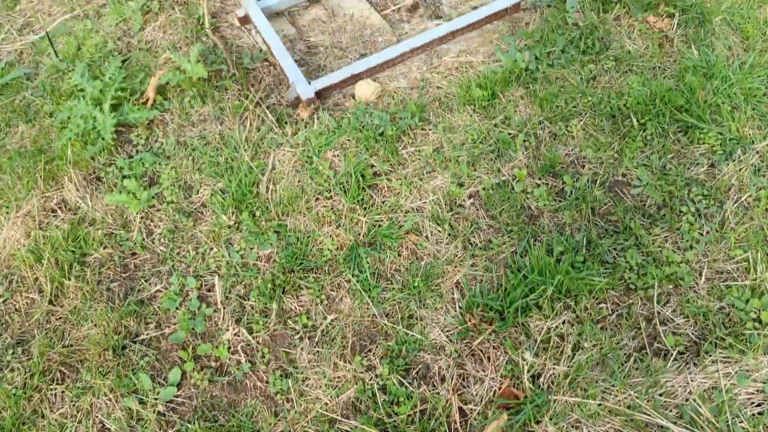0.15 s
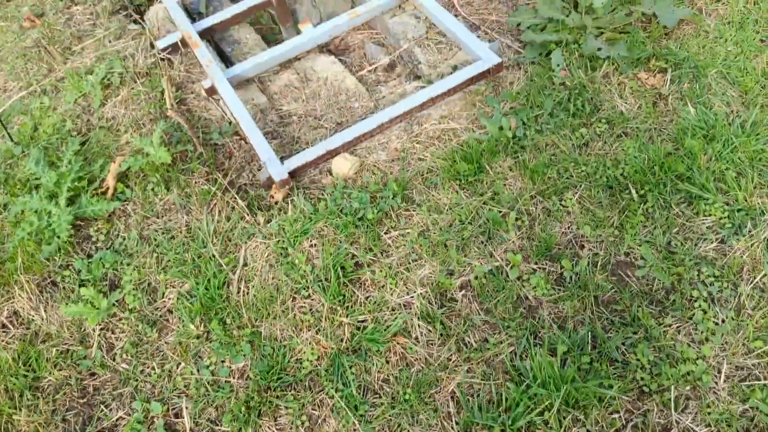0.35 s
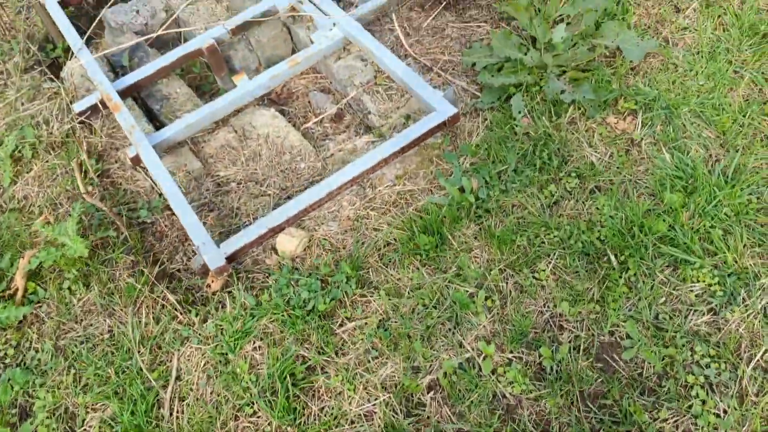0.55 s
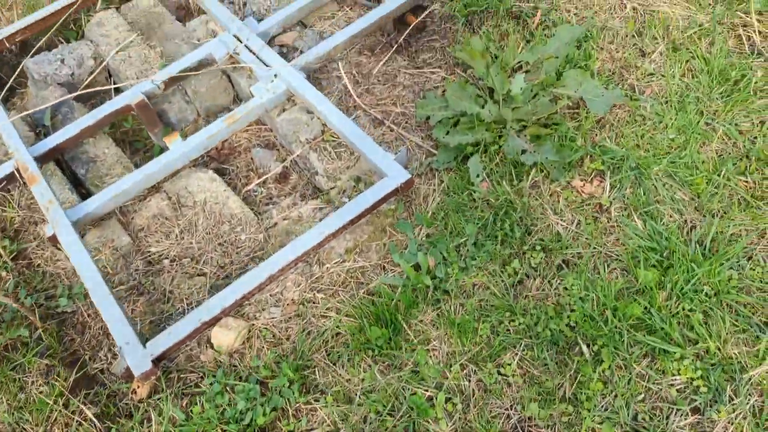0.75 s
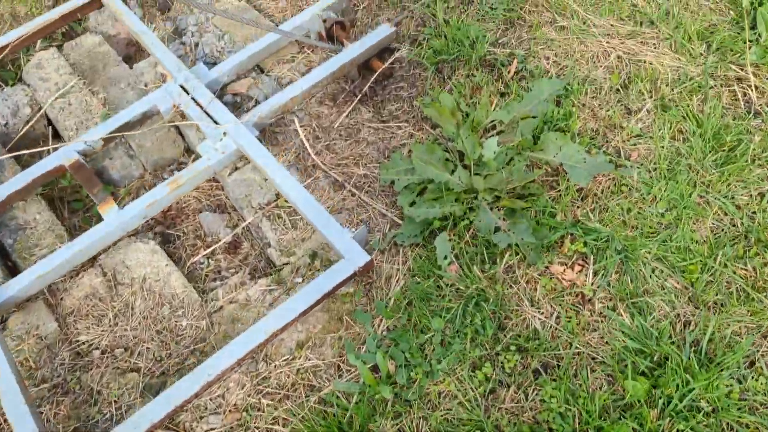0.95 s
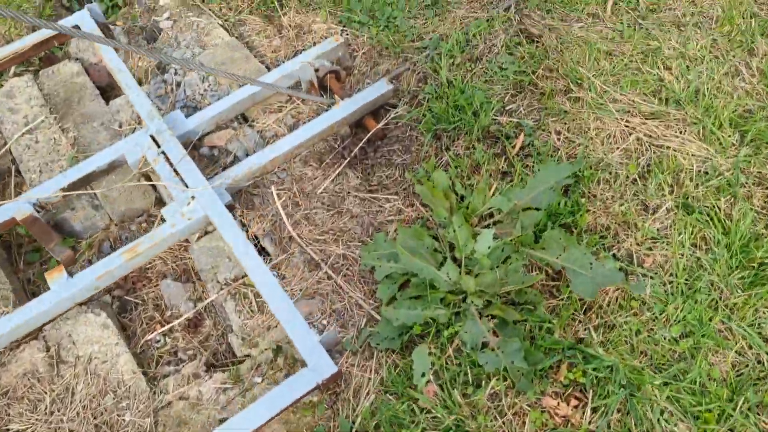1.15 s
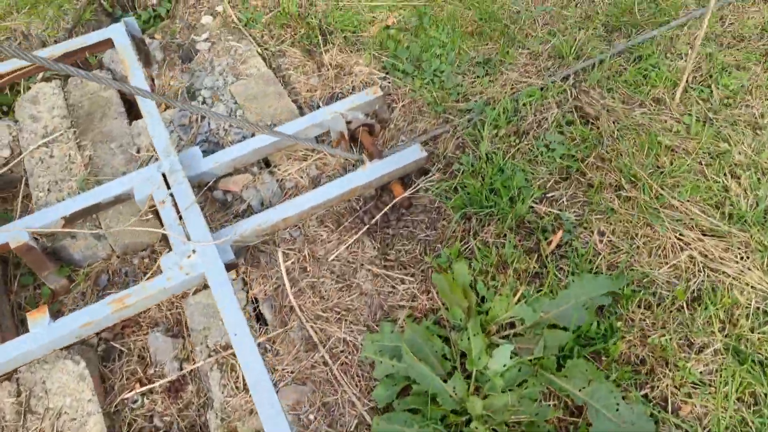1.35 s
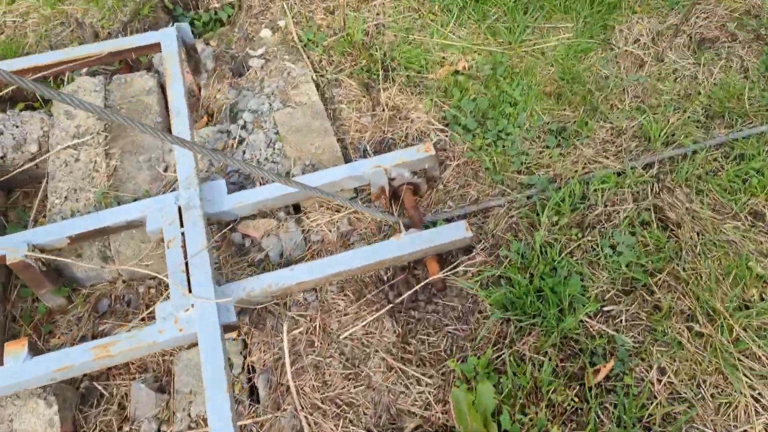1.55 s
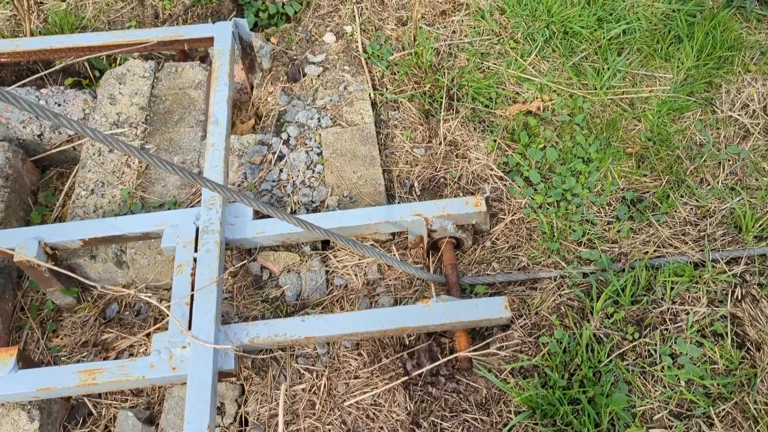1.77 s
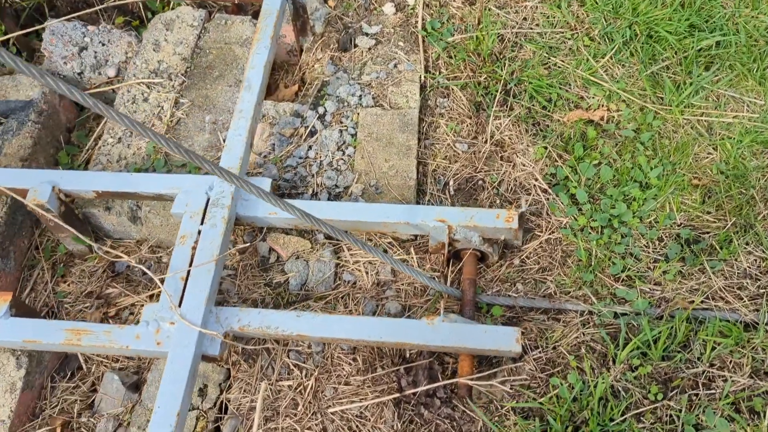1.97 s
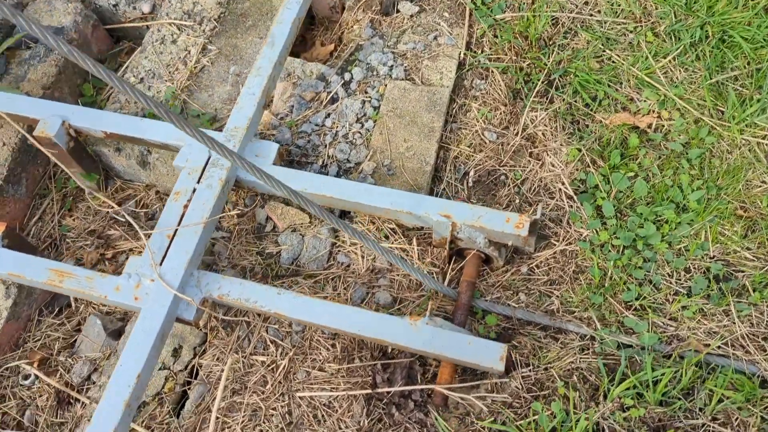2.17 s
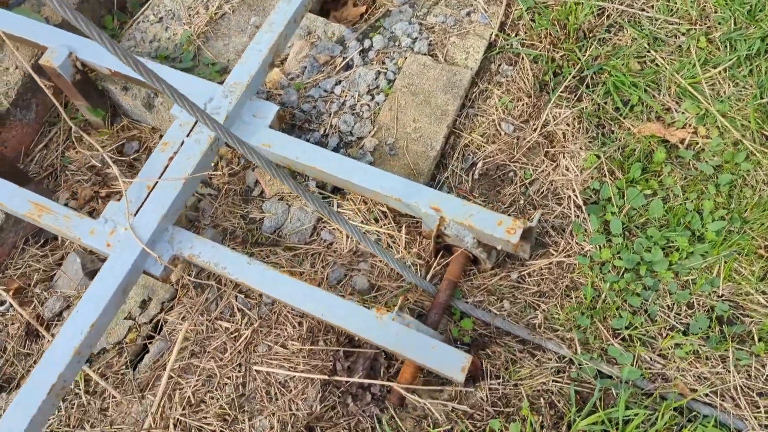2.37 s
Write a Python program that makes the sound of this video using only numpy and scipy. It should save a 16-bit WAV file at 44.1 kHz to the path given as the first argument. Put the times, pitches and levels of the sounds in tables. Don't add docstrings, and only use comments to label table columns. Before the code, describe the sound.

Slow footsteps through rough dry grass, crackling and snapping, close and dry outdoors; right at the start a quick cluster of loud clicks and knocks from a shifting grip on the hand-held camera, mostly left.

```python
import sys
import numpy as np
from scipy import signal
from scipy.fft import rfft, irfft, next_fast_len
from scipy.io import wavfile
from scipy.ndimage import uniform_filter1d, map_coordinates

SR = 44100
rng = np.random.default_rng(int(sys.argv[2]) if len(sys.argv) > 2 else 0)


def undo_db(level):
    steps = np.asarray(level, float) / 20
    return 10 ** steps


def transcribe(u):
    v = np.clip(np.atleast_2d(u).T, -1, 1)
    q = np.round(v * 32767).astype(np.int16)
    wavfile.write(sys.argv[1], SR, q)


N = 106369

# peak t/s, rise/s, fall/s, level/dB, tilt/(dB per octave)
SHOE_SWEEPS = [(0.034, 0.073, 0.046, -39, -0.3), (0.141, 0.014, 0.035, -49.5, 1),
               (.168, 0.0094, 0.012, -52.5, -1), (0.208, 0.022, 0.026, -38.5, -2),
               (0.328, 0.034, 0.11, -47, 0.3), (.55, 0.12, 0.053, -53.5, 2.5), (.68, 0.039, 0.021, -56, 0),
               (.79, 0.046, 0.039, -59, -7), (0.952, 0.025, 0.061, -47.5, 5.5),
               (1.037, 0.045, .1, -54.5, -0.4), (1.212, 0.082, 0.023, -54, -1),
               (1.332, 0.061, 0.2, -60.5, -0.1), (1.55, 0.059, 0.032, -60.5, 2.2),
               (1.574, 0.037, 0.019, -50, 2), (1.68, 0.11, 0.14, -57.5, -0.45),
               (2.03, 0.018, 0.026, -60.5, -2.5), (2.074, 0.032, 0.064, -43, .5),
               (2.19, 0.045, 0.069, -54, -0.5), (2.276, 0.037, 0.057, -55, 1.3)]
# t/s, peak level/dB, f/Hz, left over right/dB
STALK_SNAPS = [(.008, -32, 3600, 18.5), (.0271, -27, 3220, 0.5), (.0306, -33, 5000, -5.5),
               (.0355, -26, 5020, -6), (.0392, -24, 5250, -5), (.0418, -26.5, 3920, -0.5),
               (.138, -40, 6980, 3), (.142, -31, 9020, 13.5), (.2728, -28, 6280, -15.5),
               (.3037, -35.5, 6040, 0.5), (.5308, -45, 3180, -4), (.6729, -37.5, 5530, -3),
               (.6819, -37.5, 4570, -7.5), (.9548, -36, 2070, -4), (1.0254, -26.5, 5670, -2.5),
               (1.0267, -18, 5470, 8), (1.0293, -16, 6890, 5), (1.031, -29, 7960, 12),
               (1.0396, -29, 2900, -5), (1.0449, -33, 4545, 2), (1.2002, -32, 5170, 4),
               (1.583, -31, 4930, 1.5), (1.6979, -39, 2460, 3), (2.124, -42.5, 6930, -1),
               (2.2822, -37, 6430, -1.5)]
# t/s, peak level/dB, f/Hz, left over right/dB
CLOD_POPS = [(.0275, -36, 583, -9.5), (.036, -43, 380, -18), (.0395, -38, 614, -16), (.1536, -37, 1510, 4),
             (.2755, -39.5, 570, 5), (.3359, -24, 820, 2.5), (.4945, -52.5, 410, -8),
             (.686, -46.5, 1112, -1.5), (.8235, -48.5, 626, 6), (.962, -52.5, 455, 2),
             (1.038, -35.5, 1310, -4), (1.0452, -38, 1370, -1), (1.1312, -46, 855, 1),
             (1.1676, -45, 690, 1), (1.2, -40, 1570, -11.5), (1.307, -54, 380, 0.5), (1.5845, -35, 1440, 0),
             (1.6715, -53.5, 420, -7), (1.7964, -50, 627, 10), (1.8, -49.5, 468, 4),
             (2.1164, -43, 1700, -20), (2.1465, -33.5, 1370, -6), (2.1744, -24, 1214, -3.5),
             (.3402, -37, 900, -3), (2.139, -45, 1500, 0), (2.232, -47, 550, 3)]
# t/s, tick level/dB, tick f/Hz, knock level/dB, knock f/Hz
CASE_SLIPS = [
    (0.1451, -6.5, 6600, -20.5, 1940),
    (0.1625, -1, 7780, -15.5, 450),
    (0.1901, -4.5, 2780, -6.5, 775),
    (0.1994, -0.5, 6900, -7.5, 339),
    (0.2178, -13.5, 7500, -18, 1150),
]
SLIP_CREEPS_DB = [-36, -41, -29, -45, -35]
# t/s, left peak level/dB, f/Hz, right re left/dB
FINGER_PRESSES = [(.246, -36.5, 109.5, -26), (0.201, -38, 85, -20), (0.258, -32, 98, -28),
                  (0.283, -43, 90, -23), (0.309, -37.5, 87.5, -23), (.323, -35.5, 105, -29),
                  (0.353, -47, 90, -9), (.378, -42.5, 93, -19), (0.438, -47.5, 88, -18),
                  (0.608, -64.5, 55, -10), (.77, -54.5, 112, -18), (0.83, -57, 60.6, -18.5),
                  (1.21, -59, 121, -2), (1.687, -69, 65.6, 1.5), (1.83, -63, 54.5, -16)]
# t/s, peak level/dB, f/Hz, left over right/dB
SINGLE_RINGS = [(0.0277, -35.5, 480, -10.5), (.0307, -32, 6440, -13), (0.0357, -27, 4060, 2),
                (0.0352, -31.5, 7740, -9), (0.0366, -36.5, 407, -11), (0.0397, -27, 6300, -13),
                (0.0395, -36, 8600, -6), (0.0447, -39.5, 355, -6), (.062, -43.5, 403, -9),
                (0.1444, -16, 13000, 0), (0.1454, -24, 10100, 3.5), (.16255, -22.5, 3900, 6),
                (.16255, -27, 13400, -2.5), (.1905, -22, 6800, 3), (.1996, -20, 2730, 14.5),
                (.1996, -19, 13500, -2.5), (0.2011, -21, 1500, 13), (0.2188, -21.5, 1294, 13.5),
                (0.4944, -33.5, 1400, -6), (0.4934, -30, 2920, -5.5), (0.5387, -39.5, 1960, 5),
                (.538, -37.5, 3520, 2), (.538, -44.5, 4530, -2.5), (0.5607, -40, 4010, 5),
                (0.5602, -37.5, 5440, -4.5), (.5603, -42.5, 7500, -3), (1.3075, -43, 1070, 6),
                (1.3067, -41, 2810, 0), (1.3063, -47.5, 5780, -5), (1.3068, -43, 8600, -8),
                (1.5352, -50, 1750, -4), (1.538, -43.5, 1880, 3), (1.552, -43, 1940, -8),
                (1.564, -35, 4420, -8), (1.698, -47, 3240, 0), (1.737, -54, 4500, -4),
                (1.8, -51, 2400, 0.5), (2.024, -44.5, 1800, 1), (2.0295, -46, 1840, -1.5),
                (2.037, -46, 1504, -3), (2.064, -39, 7000, 1), (2.07, -47, 1510, 0), (2.08, -44, 1800, 0),
                (2.0852, -39, 4550, 2), (2.102, -40.5, 2700, 6), (2.102, -38, 7540, -7),
                (2.2475, -35, 11900, 0), (2.2475, -42, 5240, -2), (2.2557, -44, 1950, 2),
                (2.2553, -41, 4580, -2)]
# f/Hz, density level/dB
BLADE_SPECTRUM = [(24, -53), (40, -27), (479, -13), (570, -10.5), (697, -9), (1850, 0), (2150, -2.5),
                  (7170, -4.5), (16000, -13.5)]
# f/Hz, density level/dB
FIELD_SPECTRUM = [(20, -28.5), (40, -15), (90, -5.5), (250, -14.5), (500, -11), (4900, -9), (7000, -5.5),
                  (15700, -11.5)]
# f/Hz, likeness/1
PORT_LIKENESS = [(60, 0.9), (240, 0.77), (950, 0.15), (3770, 0.027), (15000, 0.1)]
# pitch ratio/1, level/dB
CRACK_MODES = [(1.015, 3.5), (0.717, -14), (1.446, 0), (2.4, -19)]

FIELD_DB, WHINE_HZ, WHINE_DB = -63.5, 13615, -78
SNAP_CYCLES, POP_CYCLES = 6, 3.2
DEBRIS_DB, DEBRIS_S = -19, .003
CRACKLE_DB, PATCH_DB = 2.5, 2
GRIP_LAG_S, CREEP_S = .0003, .0029
GRIP_RIGHT_DB, KNOCK_RIGHT_DB = -11.5, -15.5
BUZZ_DB, BUZZ_S = -20.5, .0006
RING_S = .0005
DIFFUSE_TOP_HZ, EDGE_HZ = 15750, 16950
LAG_S_PER_DB = -.00002


def unit(x):
    return x / np.sqrt(np.mean(x ** 2) + 1e-20)


def along(points, hz):
    f, v = np.transpose(points)
    return np.interp(np.log(hz + 1), np.log(f + 1), v)


def wobble(rate_hz):
    knots = rng.standard_normal(int(N * rate_hz / SR) + 4)
    return map_coordinates(knots, [np.arange(N) * rate_hz / SR])


def coloured(pair, spectrum, tilt_db):
    m = next_fast_len(N + SR // 4)
    hz = np.fft.rfftfreq(m, 1 / SR)
    turn = np.arccos(np.clip(along(PORT_LIKENESS, hz), -1, 1)) / 2
    level_db = along(spectrum, hz) + tilt_db * np.log2((hz + 1) / 3000)
    gain = undo_db(level_db) * (hz < DIFFUSE_TOP_HZ) * [np.cos(turn), np.sin(turn)]
    mid, side = irfft(rfft(pair, m) * gain, m)[:, :N]
    return unit(np.array([mid + side, mid - side]))


def add(out, s, x, pan_db, lag_s):
    out[0, round(s * SR):][:x.shape[1]] += undo_db(pan_db / 2) * x[0]
    out[1, round((s + lag_s) * SR):][:x.shape[1]] += undo_db(-pan_db / 2) * x[1]


def click(hz, cycles, droop=0., debris_db=DEBRIS_DB, onset=3.3):
    t = np.arange(SR // 30) / SR
    ratio, db = np.transpose(CRACK_MODES)[:, :, None]
    draw = rng.standard_normal((2, 2, len(CRACK_MODES), 1)) * (db < 0)
    f = np.clip(hz * ratio * np.exp(0.097 * draw[0]), 100, SR / 2.6)
    bent_t = t + droop * (1 - np.exp(-t * hz)) / hz
    decay = undo_db(db + 0.96 * draw[1] - 30 * t * f / cycles)
    attack = (1 - np.exp(-t * hz * onset)) ** 2
    modes = (decay * attack * np.cos(2 * np.pi * f * bent_t)).sum(1)
    edges_hz = np.clip([hz / 1.92, hz * 1.9], 50, SR / 2.4)
    band = signal.butter(2, edges_hz, "band", fs=SR, output="sos")
    noise = unit(signal.sosfilt(band, rng.standard_normal((2, len(t)))))
    debris = undo_db(debris_db) * noise * np.exp(-t / DEBRIS_S) * (1 - np.exp(-t * hz))
    high = signal.butter(3, hz / 2.32, "high", fs=SR, output="sos")
    return signal.sosfilt(high, modes / np.abs(modes).max() + debris)


def field():
    hiss = coloured(rng.standard_normal((2, N)), FIELD_SPECTRUM, 0)
    hiss = undo_db(FIELD_DB + 0.27 * wobble(4.3)) * hiss
    air_spectrum = [(20, -22.5), (60, 5.5), (150, -5.0), (400, -32), (500, -120)]
    air = coloured(rng.standard_normal((2, N)), air_spectrum, 0)
    air = undo_db(-87.0 + 2.6 * np.array([wobble(18), wobble(13)])) * air
    phase = 2 * np.pi * WHINE_HZ * np.arange(N) / SR + 2 * wobble(20)
    whine = undo_db(WHINE_DB + 1.7 * wobble(10)) * np.sin(phase)
    return hiss + air + whine


def rings():
    out = np.zeros((2, N + SR))
    t = np.arange(SR // 50) / SR
    for s, db, hz, pan_db in SINGLE_RINGS:
        swell_s = RING_S * (1000 / hz) ** .7
        shape = (t / swell_s / 2) ** 2 * np.exp(2 - t / swell_s)
        phase = rng.uniform(0, 2 * np.pi) + rng.normal(0, .3, (2, 1))
        ring = shape * np.sin(2 * np.pi * hz * t + phase)
        add(out, s - 2 * swell_s, undo_db(db) * ring, pan_db, 0)
    return out[:, :N]


def fingers():
    t = np.arange(N) / SR
    out = np.zeros((2, N))
    for s, db, hz, right_db in FINGER_PRESSES:
        cycle = (t - s) * hz
        shape = np.exp(-np.abs(cycle / np.where(cycle < 0, .35, .9)))
        phase = rng.uniform(-2.0, 1) + 0.74 * wobble(250)
        push = shape * np.cos(2 * np.pi * cycle + phase)
        out += undo_db(db) * push * undo_db([[0], [right_db]])
    return out


def grip():
    out = np.zeros((2, N + SR))
    t = np.arange(SR // 50) / SR
    for (s, tick_db, tick_hz, knock_db, knock_hz), creep_db in zip(CASE_SLIPS, SLIP_CREEPS_DB):
        tick = click(tick_hz, 5.35, debris_db=-26.5)
        buzz = rng.standard_normal((2, len(t))) * np.exp(-t / BUZZ_S)
        tick[:, :len(t)] += undo_db(BUZZ_DB) * buzz
        knock_cycles = 3 * np.sqrt(knock_hz / 500)
        knock = click(knock_hz, knock_cycles, droop=0.65, debris_db=-21.5, onset=16)
        creep = rng.standard_normal((2, len(t))) * np.exp((t - t[-1]) / CREEP_S)
        start_s = s - 1 / tick_hz
        add(out, start_s, undo_db(tick_db + GRIP_RIGHT_DB / 2) * tick, -GRIP_RIGHT_DB, GRIP_LAG_S)
        add(out, start_s, undo_db(knock_db + KNOCK_RIGHT_DB / 2) * knock, -KNOCK_RIGHT_DB, 2 * GRIP_LAG_S)
        add(out, s - t[-1], undo_db(creep_db) * creep, 6, GRIP_LAG_S)
    return out[:, :N]


def stalks_and_clods():
    out = np.zeros((2, N + SR))
    for table, cycles in ((STALK_SNAPS, SNAP_CYCLES), (CLOD_POPS, POP_CYCLES)):
        for s, db, hz, pan_db in table:
            add(out, s - 1 / hz, undo_db(db) * click(hz, cycles), pan_db, -pan_db * LAG_S_PER_DB)
    return out[:, :N]


def patchy(depth_db, size, bins, frames, skew):
    z = signal.stft(rng.standard_normal((2, N)), nperseg=size)[2]
    patches = uniform_filter1d(rng.standard_normal(z.shape[1:]), bins, 0)
    patches = unit(uniform_filter1d(patches, frames, 1))
    return z, undo_db(depth_db * (patches + skew * patches * np.abs(patches)))


def crackle():
    z, gain = patchy(CRACKLE_DB, size=64, bins=7, frames=2, skew=.15)
    bursts = signal.istft(z * gain, nperseg=64)[1][:, :N]
    _, gain = patchy(PATCH_DB, size=512, bins=12, frames=6, skew=0)
    z = signal.stft(bursts, nperseg=512)[2]
    return signal.istft(z * gain, nperseg=512)[1][:, :N]


def grass():
    t = np.arange(N) / SR
    dull, bright = [coloured(crackle(), BLADE_SPECTRUM, tilt_db) * undo_db(1.5 * wobble(60))
                    for tilt_db in (-2.5, 1.5)]
    out = np.zeros((2, N))
    for s, rise_s, fall_s, db, tilt in SHOE_SWEEPS:
        share = np.clip(.5 + tilt / 4, 0, 1)
        shape = np.exp(-np.abs((t - s) / np.where(t < s, rise_s, fall_s)) ** 1.51)
        out += undo_db(db) * shape * (np.sqrt(1 - share) * dull + np.sqrt(share) * bright)
    return out


def scene():
    return field() + rings() + fingers() + grip() + stalks_and_clods() + grass()


def band_limit(x):
    return signal.sosfilt(signal.butter(12, 16970, fs=SR, output="sos"), x)


def record(dry):
    m = next_fast_len(N + SR // 4)
    passed = np.fft.rfftfreq(m, 1 / SR) < EDGE_HZ
    mix = irfft(rfft(dry, m) * passed, m)[:, :N]
    return band_limit(mix)


dry = scene()
out = record(dry)
transcribe(out)
```